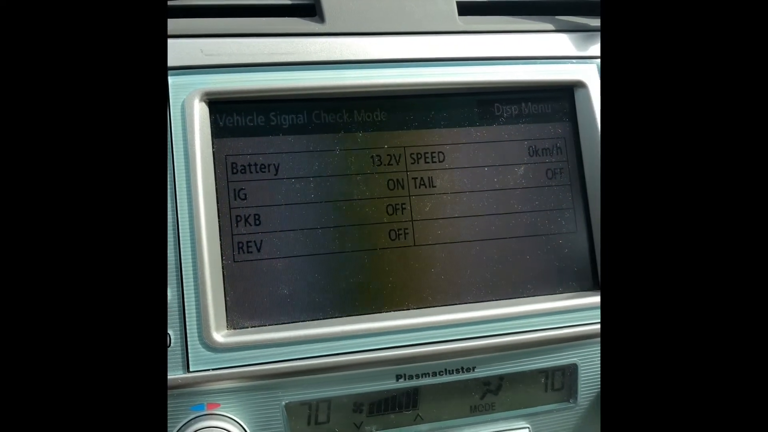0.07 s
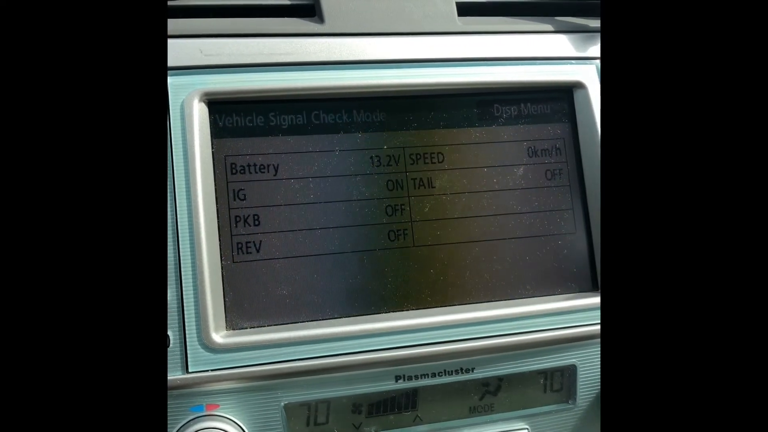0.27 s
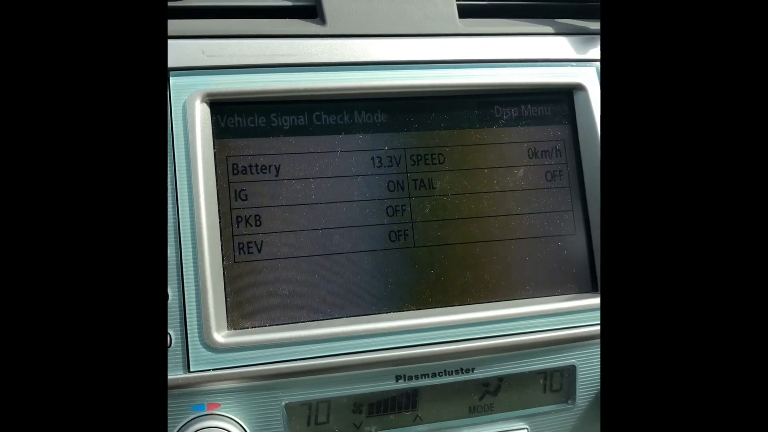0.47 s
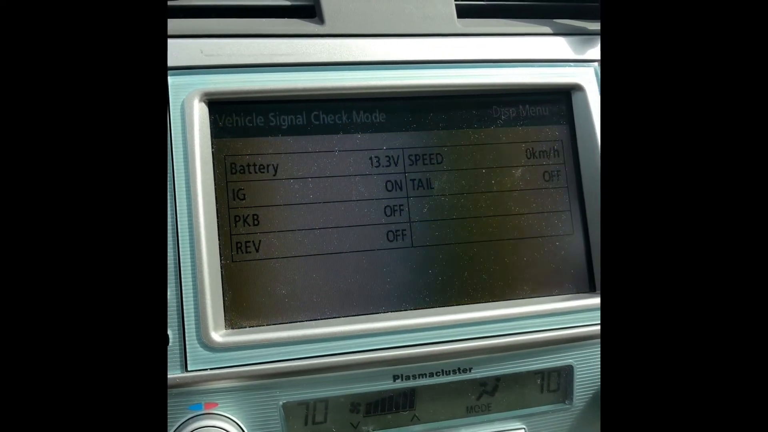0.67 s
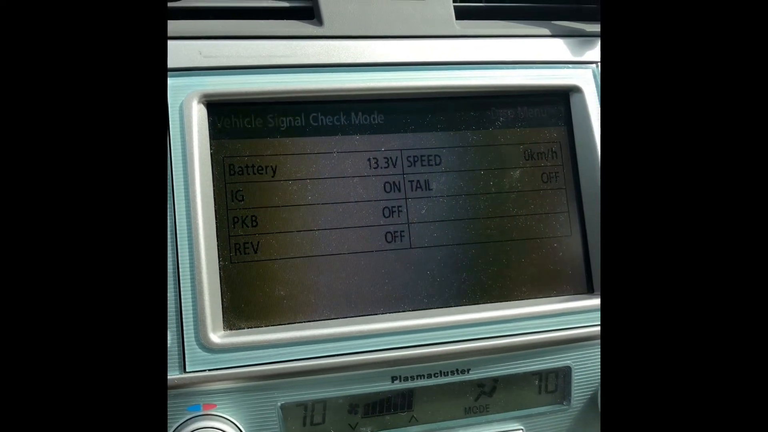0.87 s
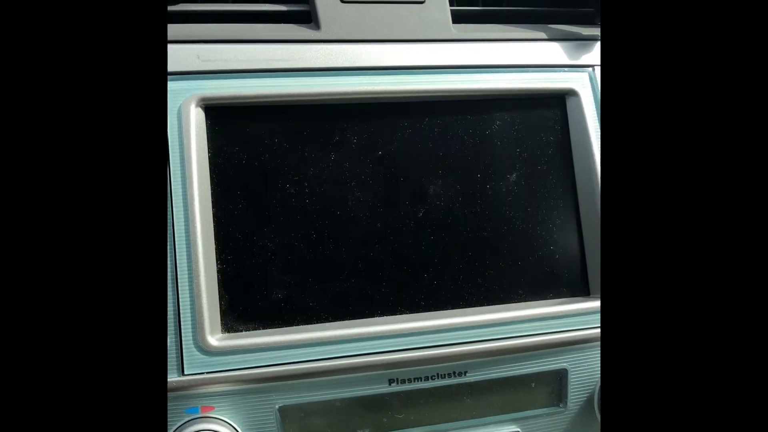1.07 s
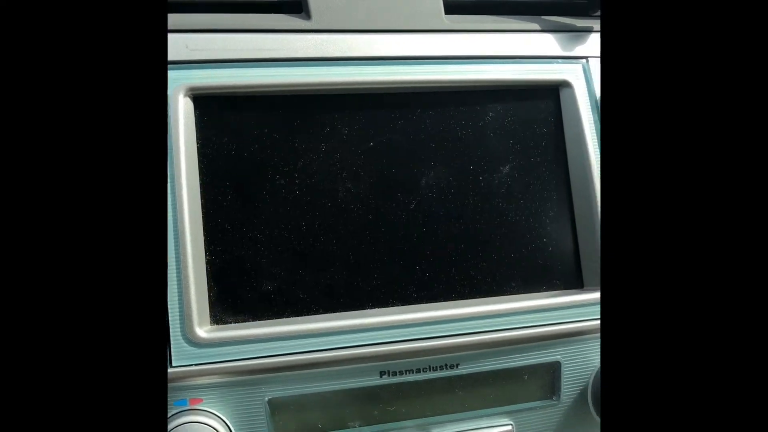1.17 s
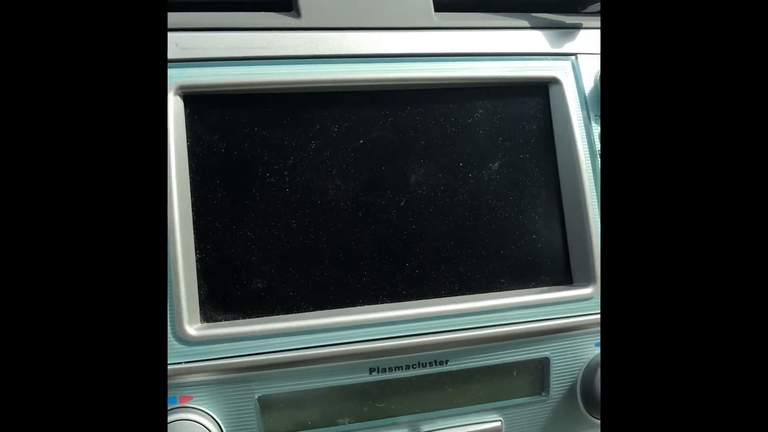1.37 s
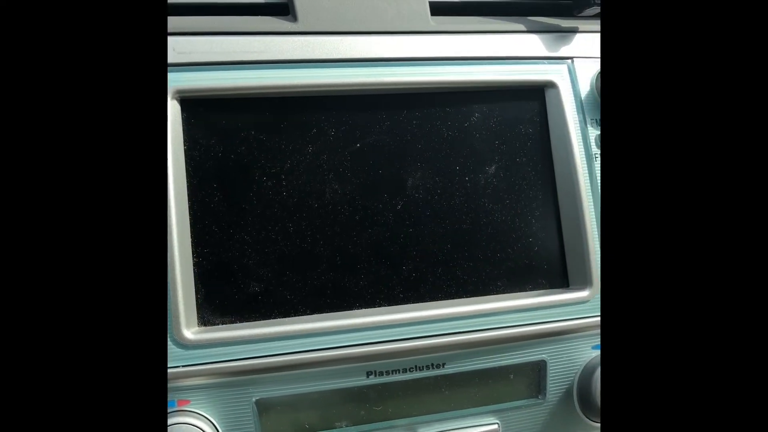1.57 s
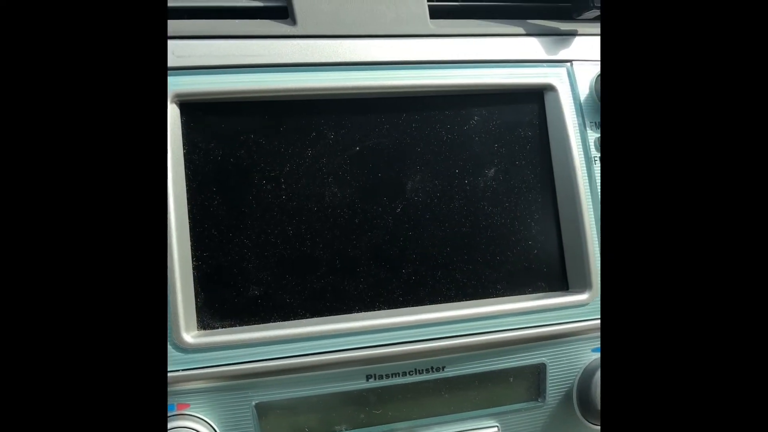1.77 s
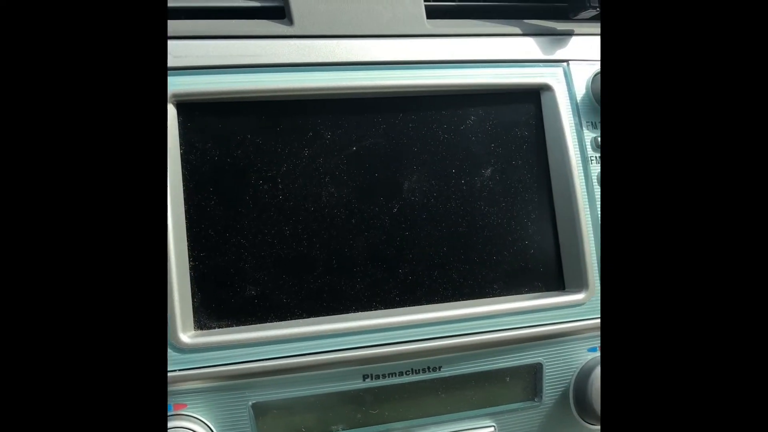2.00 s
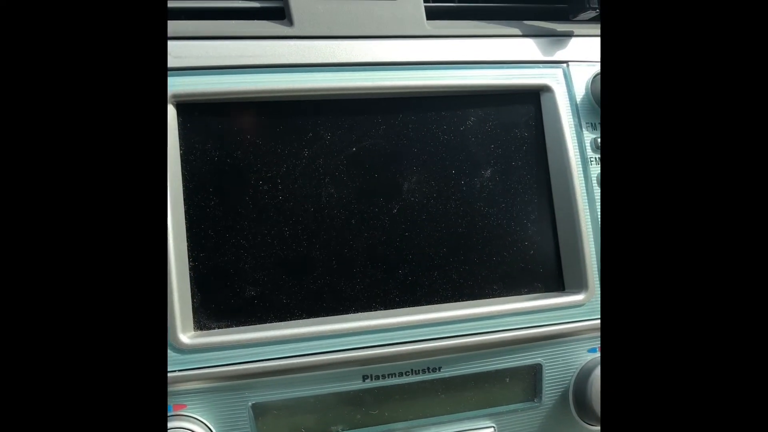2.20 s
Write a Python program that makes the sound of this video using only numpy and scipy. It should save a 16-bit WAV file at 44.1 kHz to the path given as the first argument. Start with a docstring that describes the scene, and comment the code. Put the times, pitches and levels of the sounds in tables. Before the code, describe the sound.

A car's cabin fan rushes, then winds down after a button press, with three clicks.

```python
"""A car's cabin blower roars through the dashboard ducts, close to a mono phone microphone.
Just before the one-second mark the power button is pressed: faint ticks, tiny squeaks, soft thumps.
The fan coasts down, its rush of air dying treble first, and around 1.5 s three relays click behind
the dash. A few fainter thumps follow, and the quiet cabin is left with low rumble, microphone hiss,
a thin electrical whine and a faint sinking hum."""
import sys
import numpy as np
from scipy import signal
from scipy.fft import rfft, irfft, next_fast_len
from scipy.io import wavfile
from scipy.ndimage import uniform_filter1d, map_coordinates

SR = 44100
rng = np.random.default_rng(int(sys.argv[2]) if len(sys.argv) > 2 else 0)


def inscribe(sig):
    """Save sig as 16-bit PCM at rate SR to the path in sys.argv[1].

    A 1-D sig is mono; a 2-D sig holds one channel per row.
    Samples are clipped to [-1, 1] before scaling.
    """
    pcm = np.round(np.clip(np.atleast_2d(sig).T, -1, 1) * 32767)
    wavfile.write(sys.argv[1], SR, pcm.astype(np.int16))


N = 98784
T = np.arange(N) / SR


def amp(db):
    """Decibels to linear gain."""
    return 10 ** (np.asarray(db) / 20)


def unit(x):
    """x scaled to an rms of 1."""
    return x / np.sqrt(np.mean(x ** 2) + 1e-20)


def along(points, hz):
    """Reads a curve of (freq_hz, value) points on a log frequency axis."""
    freqs, values = np.transpose(points)
    return np.interp(np.log(hz + 1), np.log(freqs + 1), values)


def wobble(rate_hz):
    """A smooth random modulator."""
    return map_coordinates(rng.standard_normal(int(N * rate_hz / SR) + 4), [T * rate_hz])


def eq(x, gain):
    """Static EQ: applies the linear gain(hz) to x."""
    size = next_fast_len(len(x) + 8192)
    return irfft(rfft(x, size) * gain(np.fft.rfftfreq(size, 1 / SR)), size)[:len(x)]


def moving_eq(x, gain_db):
    """Automated EQ: applies gain_db(hz, seconds) to x."""
    hz, t, spectrum = signal.stft(x, SR, nperseg=1024)
    return signal.istft(spectrum * amp(gain_db(hz[:, None], t[None])), SR, nperseg=1024)[1][:len(x)]


def bell(hz, centre_hz, width_hz):
    """A resonance curve of height 1."""
    return 1 / (1 + (2 * (hz - centre_hz) / width_hz) ** 2)


def add(out, start_s, x):
    """Mixes x into out at start_s."""
    part = out[round(start_s * SR):][:len(x)]
    part += x[:len(part)]


# Tone of the rushing air: freq_hz, level_db
AIR_TONE = [(18, -64), (30, -18), (45, -4.5), (60, -5.5), (85, -2), (125, -5), (160, -10.5), (280, -11.5),
            (430, -18), (750, -19), (1050, -18.5), (1330, -25), (2300, -27.5), (3400, -28), (5000, -32.5),
            (11500, -43.5), (16000, -52.5)]
# Duct resonances and notches: centre_hz, width_hz, gain_db
DUCT_BANDS = [(86, 12, 4), (271, 20, 3), (487, 30, 3), (650, 40, 3), (815, 40, 6), (1080, 50, 3),
              (1190, 35, 5), (1460, 50, 6), (1556, 35, 8), (1750, 50, 6), (1900, 50, -4), (2100, 240, 4),
              (2460, 90, -5), (2624, 60, 4), (2765, 70, 3), (3200, 200, -3), (3490, 110, 5)]
# Airflow fading as the fan coasts down: time_s, airflow_db
AIRFLOW = [(0, 0), (1.1, 0), (1.25, -5), (1.4, -12.5), (1.6, -21), (1.8, -30), (2.0, -36), (2.24, -43.5)]
# How steeply each band follows the airflow: freq_hz, db_per_airflow_db
FADE_SLOPES = [(250, 0.62), (700, 0.79), (2000, 1), (5000, 1.5), (12000, 2)]
# Fader ride on the fan's bass: time_s, gain_db
BASS_RIDE = [(0, -2), (.95, -1), (1.07, 5), (1.12, -9), (1.22, -7.5), (1.5, -11), (1.54, -17), (1.7, -37),
             (2.0, -32), (2.24, -36.5)]


def blower(level_db=-31.5, sway_db=0.27, flicker_db=0.84, crossover_hz=134):
    """Turbulent air rings the ducts; as the fan slows, the highs of the rush die first."""
    def duct_tone(hz):
        ducts_db = sum(db * bell(hz, centre, width) for centre, width, db in DUCT_BANDS)
        return amp(along(AIR_TONE, hz) + ducts_db)

    def coast_db(hz, t):
        flicker = rng.standard_normal((hz.size, t.size))
        flicker = uniform_filter1d(flicker, size=8, axis=0)
        flicker = unit(uniform_filter1d(flicker, size=4, axis=1))
        bass_share = 1 / (1 + (hz / crossover_hz) ** 4)
        bass_db = np.interp(t, *np.transpose(BASS_RIDE))
        rush_db = along(FADE_SLOPES, hz) * np.interp(t, *np.transpose(AIRFLOW))
        return bass_share * bass_db + (1 - bass_share) * rush_db + flicker_db * flicker

    air = unit(eq(rng.standard_normal(N), duct_tone))
    return amp(level_db + sway_db * wobble(7.3)) * moving_eq(air, coast_db)


# Relay clicks: start_s, level_db, low_cut_hz, high_cut_hz, rattle_s, ring_db, accent_hz
RELAY_CLICKS = [(1.4973, -29, 1500, 9000, .009, -7, 5400), (1.5667, -32, 1800, 5000, .007, -2, 3520),
                (1.6085, -23.5, 700, 3400, .011, -5.5, 850)]
# Modes of a relay housing: pitch_hz, level_db, t60_s
HOUSING_MODES = [(820, -9, .045), (1140, -7, .03), (2120, -2, .035), (2600, -3, .035), (2800, -3, .035),
                 (3500, -1, .024), (5430, -11, .05), (7300, -9, .02), (10300, -10, .01), (13300, -9, .008)]
# Colour of the dash panel in front of the relays: freq_hz, gain_db
PANEL_TONE = [(1500, -2), (2700, 3), (3600, 2), (4350, -9), (5300, 1), (6300, -1), (7200, 1), (8000, -2),
              (13500, 0), (15500, -9)]
# Cabin reverb time: freq_hz, t60_s
CABIN_DECAY = [(1000, 0.062), (5000, 0.11), (15000, 0.086)]


def relays(crack_db=-6, crack_s=.0012, ring_attack_s=.0008, accent_db=10, reverb_db=-9.5):
    """Each armature hits with a bright crack, rattles and rings its housing; the cabin answers."""
    out, t = np.zeros(N), T[:SR // 5]
    for start_s, level_db, low_cut_hz, high_cut_hz, rattle_s, ring_db, accent_hz in RELAY_CLICKS:
        noise = rng.standard_normal(len(t))
        rattle = eq(noise, lambda hz: amp(along(PANEL_TONE, hz)) / np.hypot(1, hz / high_cut_hz))
        rattle *= np.exp(-1.7 * t / rattle_s) * (1 - np.exp(-t / 0.00027))
        ring = np.zeros(len(t))
        for pitch_hz, mode_db, t60_s in HOUSING_MODES:
            lift_db = accent_db * np.exp(-(np.log(pitch_hz / accent_hz) / .2) ** 2)
            struck_db = mode_db + lift_db + rng.normal(0, 1.5)
            ring += amp(struck_db - 60 * t / t60_s) * np.sin(2 * np.pi * pitch_hz * t)
        ring *= 1 - np.exp(-t / ring_attack_s)
        crack = amp(crack_db) * rng.standard_normal(len(t)) * np.exp(-t / crack_s) / 2
        contact = (rattle + crack) / 1.6
        tail = moving_eq(rng.standard_normal(len(t)),
                         lambda hz, s: along(PANEL_TONE, hz) / 2 - 60 * s / along(CABIN_DECAY, hz))
        reverb = signal.fftconvolve(contact, tail / np.linalg.norm(tail))[:len(t)]
        click = contact + amp(ring_db) * ring / 4 + amp(reverb_db) * reverb
        low_cut = signal.butter(2, low_cut_hz, "high", fs=SR, output="sos")
        add(out, start_s, amp(level_db) * signal.sosfilt(low_cut, click))
    return out


# Low thumps: start_s, level_db, pitch_hz, cycle_count, polarity, drop_ratio (pitch fall over mean pitch)
DASH_THUMPS = [(.9498, -22, 240, 1.7, -1, 1.6), (.9645, -23, 95, 2.9, 1, .3),
               (1.021, -23.5, 75, 1.3, 1, .3), (1.0565, -21, 125, 1.6, -1, 1),
               (1.0780, -21, 165, 1.9, 1, 1.4), (1.474, -38, 200, 2.1, 1, 1.4),
               (1.720, -41.5, 72, 1.5, -1, .3), (1.744, -46, 75, 1, 1, .3), (1.8345, -42, 135, 1.8, -1, .3),
               (2.186, -48, 80, 1.7, 1, .5)]


def thumps():
    """Soft pushes through the hand and dash: a few low cycles that sink in pitch."""
    out = np.zeros(N)
    for start_s, level_db, pitch_hz, cycles, polarity, drop in DASH_THUMPS:
        progress = T[:int(cycles / pitch_hz * SR)] * pitch_hz / cycles
        envelope = np.sin(np.pi * progress ** 0.51)
        phase = 2 * np.pi * cycles * (progress + drop * progress * (1 - progress) / 2)
        add(out, start_s, polarity * amp(level_db) * envelope * np.sin(phase))
    return out


# Ticks and squeaks of the button, both: start_s, level_db, pitch_hz, t60_s
BUTTON_TICKS = [(.7265, -33, 6300, .0025), (.7265, -35, 9800, .0025), (.7315, -39, 9800, .003),
                (.7355, -35, 6000, .0015), (.736, -40, 12800, .0015), (.8625, -42, 9200, .007),
                (.863, -42, 6200, .002), (.870, -42, 9300, .007)]
BUTTON_SQUEAKS = [(.943, -48, 14100, .035), (.946, -49, 15200, .035), (.967, -46, 15400, .03),
                  (.969, -50, 14200, .025)]


def button():
    """The press gives tiny high pings: nearly clean for ticks, roughened by noise for squeaks."""
    out, t = np.zeros(N), T[:SR // 20]
    for cues, roughness in ((BUTTON_TICKS, .15), (BUTTON_SQUEAKS, 4)):
        for start_s, level_db, pitch_hz, t60_s in cues:
            envelope = amp(-60 * t / t60_s) * (1 - np.exp(-t / (t60_s / 8))) ** 2
            grit = unit(uniform_filter1d(rng.standard_normal(len(t)), size=36))
            grain = (1 + roughness * grit) / np.hypot(1, roughness)
            ping = envelope / envelope.max() * np.sin(2 * np.pi * pitch_hz * t)
            add(out, start_s, amp(level_db) * grain * ping)
    return out


# Noise floor of cabin and microphone: freq_hz, level_db
FLOOR_TONE = [(18, -27), (40, -2.5), (125, 0), (180, -6.5), (300, -17.5), (450, -13), (800, -20.5),
              (1300, -27), (3000, -31), (16000, -40.5)]


def room_tone(level_db=-61, lumps_db=-0.5):
    """Cabin rumble and microphone hiss, slightly lumpy below 200 Hz."""
    bed = unit(eq(rng.standard_normal(N), lambda hz: amp(along(FLOOR_TONE, hz))))
    lumps = lumps_db * wobble(24.04)[::512]
    return amp(level_db) * moving_eq(bed, lambda hz, t: (hz < 200) * np.interp(t, T[::512], lumps))


# Bands of the whine: centre_hz, width_hz, level_db
WHINE_BANDS = [(7860, 480, -88), (8600, 460, -91)]


def whine():
    """A thin electrical whine: two narrow bands of high noise."""
    return sum(amp(db) * unit(eq(rng.standard_normal(N), lambda hz: bell(hz, centre, width)))
               for centre, width, db in WHINE_BANDS)


# Glide of the closing hum: time_s, pitch_hz, level_db
HUM_GLIDE = [(2.0, 372, -78), (2.08, 353, -69), (2.13, 345, -62), (2.18, 336, -66), (2.22, 330, -58)]


def hum(waver_db=2):
    """A faint wavering tone comes in at the end and sinks in pitch."""
    time_s, pitch_hz, level_db = np.transpose(HUM_GLIDE)
    envelope = amp(np.interp(T, time_s, level_db, left=-120) + waver_db * wobble(19.5))
    phase = 2 * np.pi * np.cumsum(np.interp(T, time_s, pitch_hz)) / SR
    return envelope * np.sqrt(2) * np.sin(phase)


def scene():
    """One mono mix feeds both channels."""
    mix = blower() + relays() + thumps() + button() + room_tone() + whine() + hum()
    return np.tile(mix, (2, 1))


def record(dry):
    """A steep high cut takes off the very top."""
    stop_hz, slope_width_hz = 15950, 400
    return np.array([eq(x, lambda hz: np.clip((stop_hz - hz) / slope_width_hz, 0, 1) ** 2) for x in dry])


dry = scene()
out = record(dry)
inscribe(out)
```